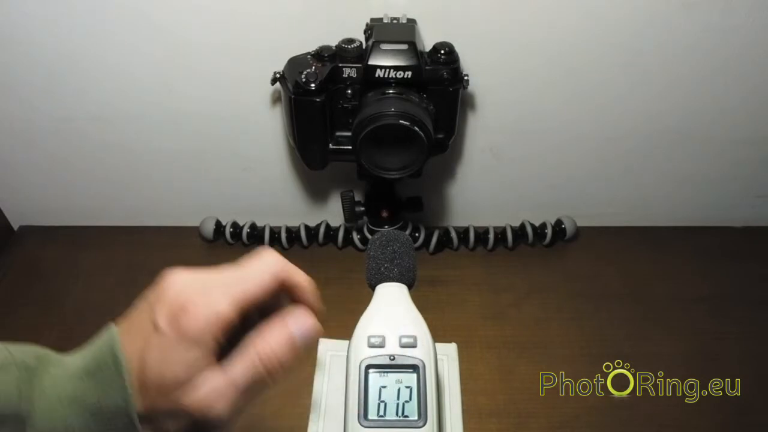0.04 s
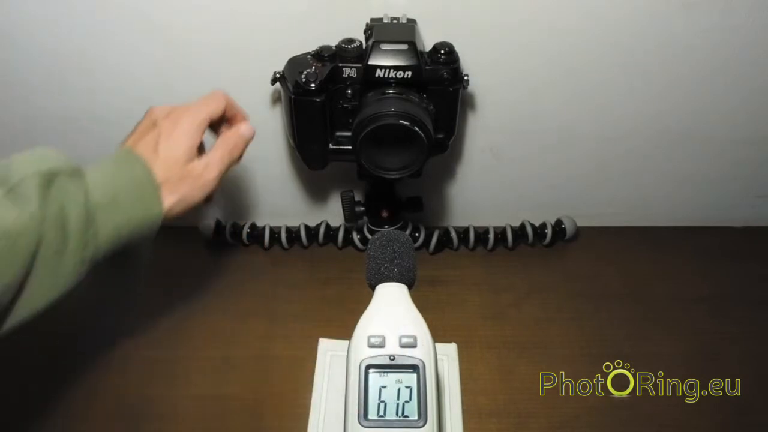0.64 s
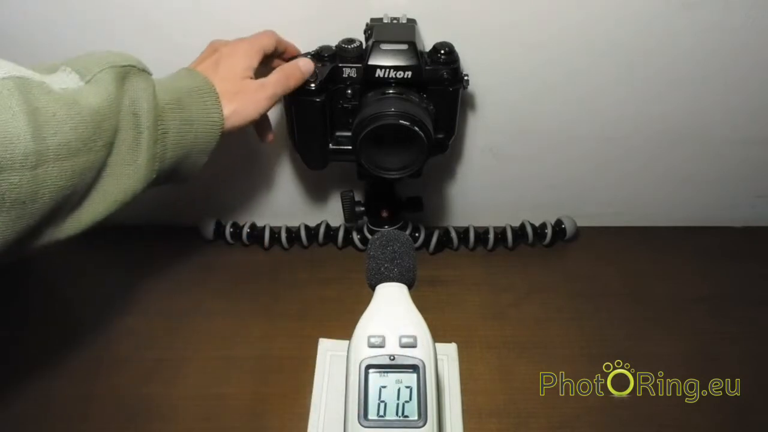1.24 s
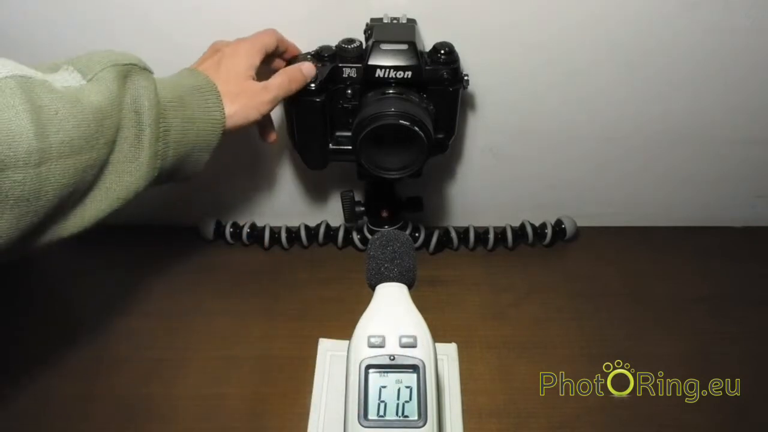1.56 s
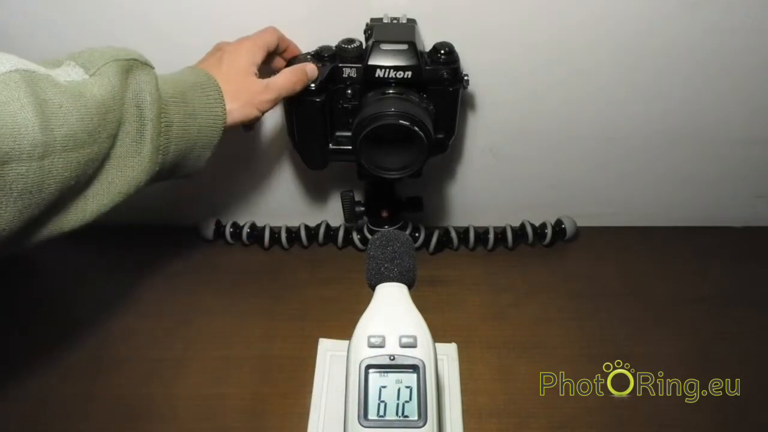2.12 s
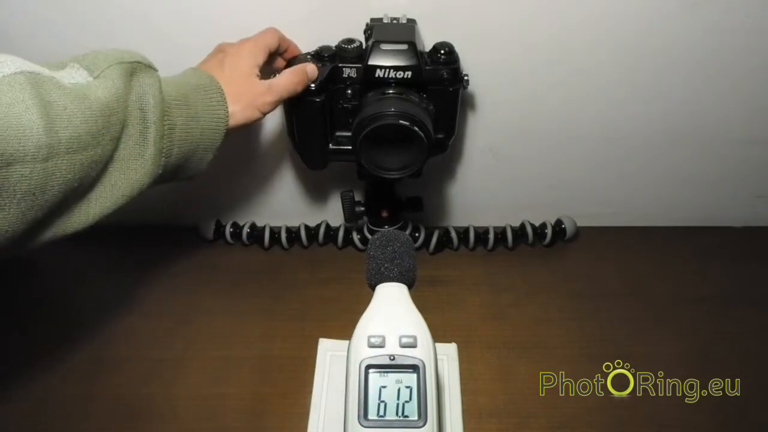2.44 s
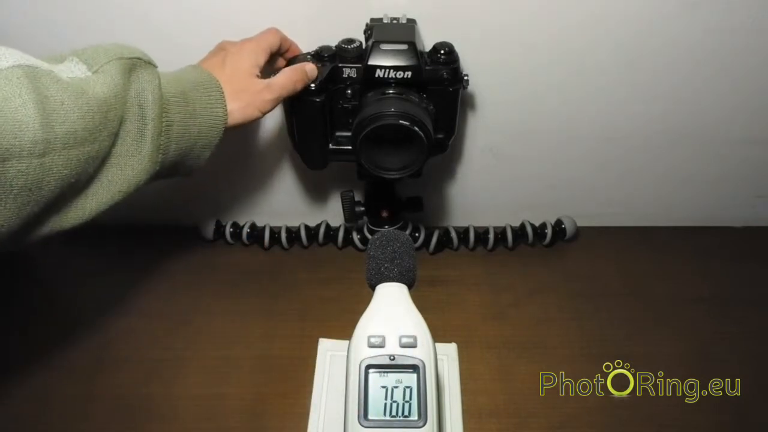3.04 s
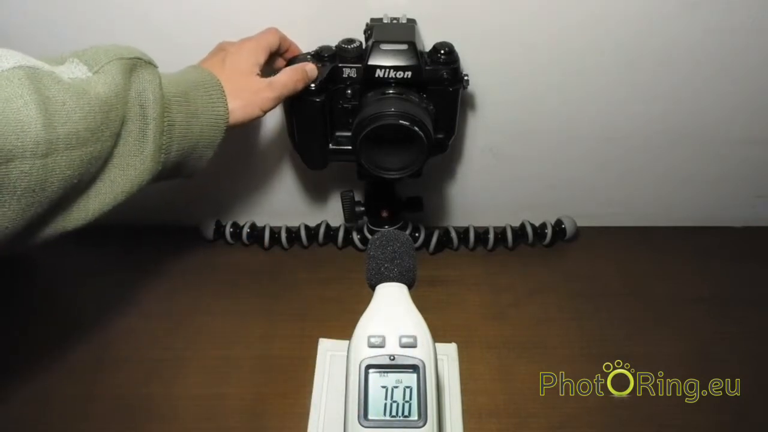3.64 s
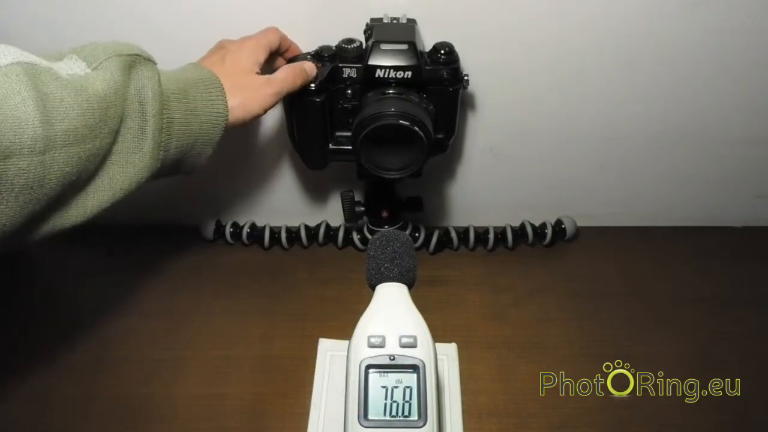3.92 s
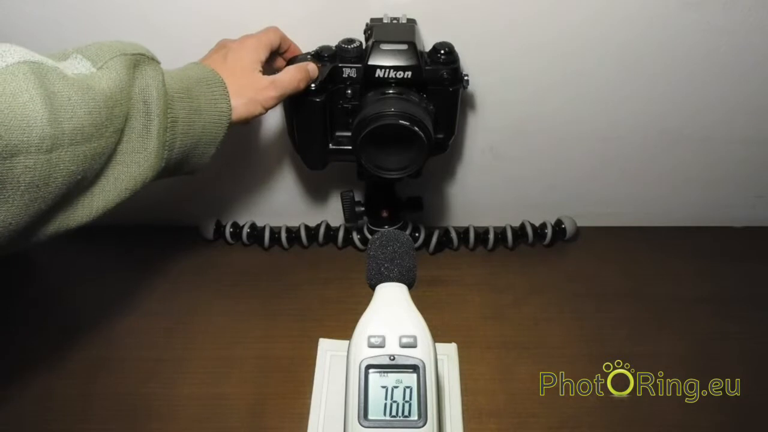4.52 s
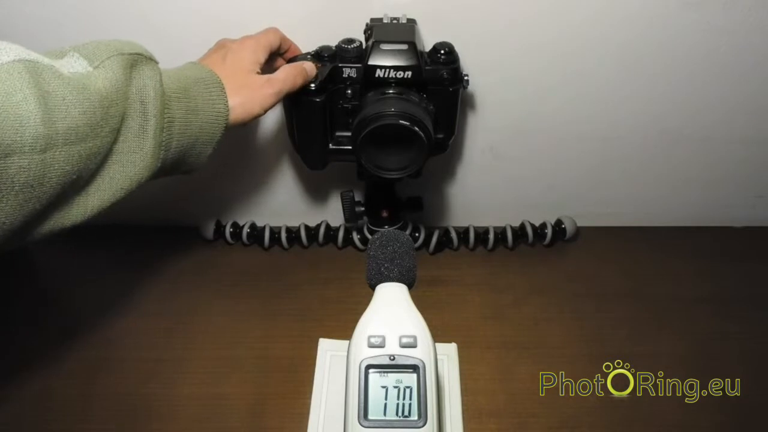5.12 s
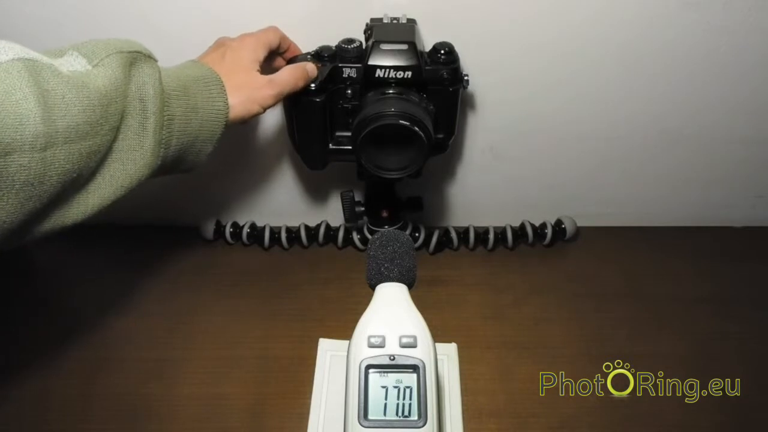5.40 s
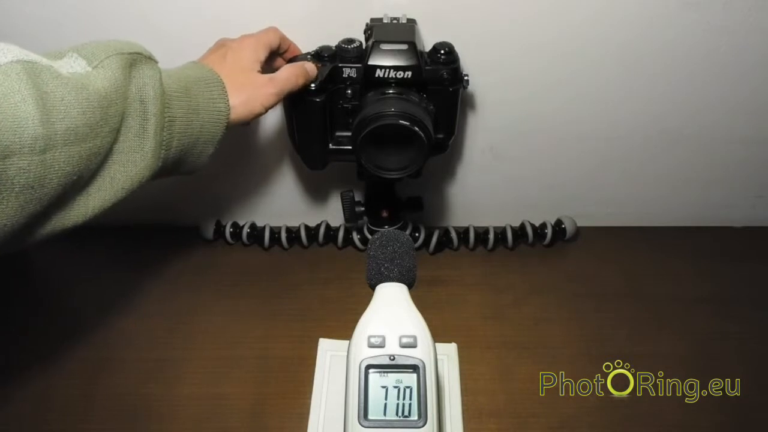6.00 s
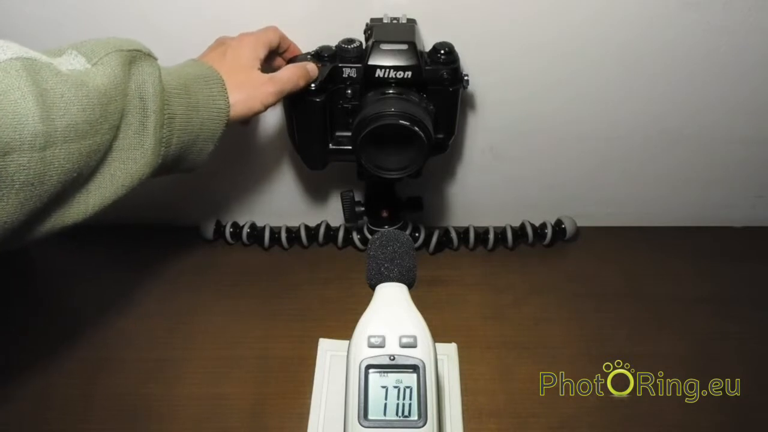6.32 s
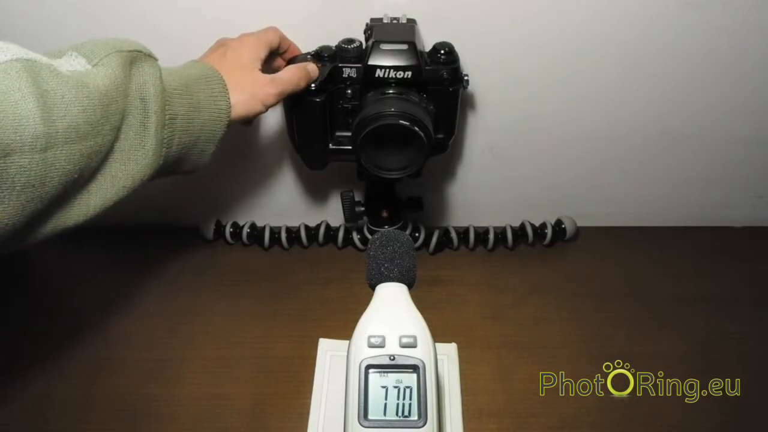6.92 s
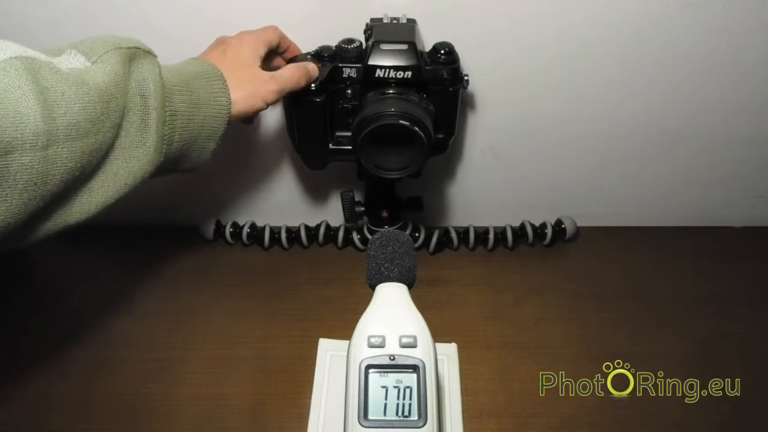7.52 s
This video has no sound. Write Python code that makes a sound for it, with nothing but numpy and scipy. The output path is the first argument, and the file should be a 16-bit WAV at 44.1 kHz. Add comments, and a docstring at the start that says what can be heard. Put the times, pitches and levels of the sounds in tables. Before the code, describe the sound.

For the first two seconds there is only soft room hiss and a faint, distant low rumble. At about 2.4 seconds a motorised film camera on a small tripod fires, close to the microphone. It fires again at about 3.3, 4.5, 5.6, 6.6 and 7.6 seconds, six single shots in all, the last right at the end. Each shot lasts about a quarter of a second and sounds nearly the same: a sharp, bright clack as the mirror flips up, a shutter click, then a quick rattling, rising whirr of gears with tiny ticks as the film winds, ending in a hard click. A slight low shudder of the camera body lies underneath. After each shot comes a short room echo, and springs ring on very faintly with a thin metallic tone. The hiss continues steadily between the shots.

```python
"""Quiet room: a motorised film camera on a small tripod fires six single frames.
Per frame the mirror flips up, the shutter closes, the mirror drops; each blow rings the part struck.
A small motor cocks the mechanism past a latch and winds the film to a stop: gears rattle and whine,
a pawl ticks, the body rocks on its tripod. Springs ring on faintly.
Behind it: a short room tail, hiss and a distant rumble."""
import sys
import numpy as np
from scipy import signal
from scipy.fft import rfft, irfft, next_fast_len
from scipy.io import wavfile

SR = 44100
rng = np.random.default_rng(int(sys.argv[2]) if len(sys.argv) > 2 else 0)


def bounce(signal):
    """Save signal as a 16-bit WAV file at the path given by the first command-line argument."""
    frames = np.transpose(np.atleast_2d(signal))
    limited = np.clip(frames, -1, 1)
    pcm = np.round(limited * 32767).astype(np.int16)
    wavfile.write(sys.argv[1], SR, pcm)


N = 341775
CYCLE_S = np.arange(int(.3 * SR)) / SR   # time after release
GRID_HZ = np.maximum(np.fft.rfftfreq(8192, 1 / SR), 1)

# frames: release t/s, winding lag/s, blow gain/dB, return spring level/dB
FRAMES = [(2.3642, -0.001, 0.0, -72.5), (3.3254, -0.00068, 0.3, -66), (4.5284, -0.0029, 0.1, -63.5),
          (5.5654, -0.00056, 0.5, -67), (6.6069, 0.0024, 0.0, -73), (7.6075, -0.00023, 0, -70)]
WINDING_PARTS = ("mirror down", "latch", "gears", "pawl", "stop")
# blows of one cycle: part, t/s after release, level/dB, lead of first touch/s
BLOWS = [("mirror up", .0021, -17, 0.0016), ("mirror up", .0038, -14.5, .002),
         ("mirror up", .0232, -23, 0.0075), ("shutter", .0591, -21.5, .0035),
         ("mirror down", .0828, -29, .002), ("mirror down", .0875, -26, .002),
         ("mirror down", .112, -30, .004), ("latch", .129, -17, .003), ("gears", .1845, -29.5, 0.0035),
         ("stop", .192, -25, .003), ("stop", .1968, -17, .002), ("stop", .2158, -27, .006)]
# moving parts, by name: blow t60/s, left minus right/dB
PARTS = {"mirror up": (0.026, -1.5), "shutter": (0.034, 0), "mirror down": (0.063, -.5),
         "latch": (0.026, -1.5), "gears": (0.05, -.5), "pawl": (.042, -2), "stop": (0.035, -1)}
# broad response, by part: f/Hz, level/dB
PART_COLOUR = {"mirror up": [(200, -25), (450, -21), (700, -23.5), (1100, -8.5), (1800, -2.5), (3500, -9.5),
               (6000, 0), (9000, -3), (11500, -11), (15500, -18.5)], "shutter": [(200, -10.5), (450, -13.5),
               (700, -0.5), (1100, -1.5), (1800, -2.5), (3500, 0), (6000, 1), (9000, 1.5), (11500, -11.5),
               (15500, -23)], "mirror down": [(200, -25), (450, -26), (700, -5), (1100, -5.5), (1800, -8.5),
               (3500, 0.5), (6000, -4), (9000, -5.5), (11500, -18), (15500, -28)], "latch": [(200, -29),
               (450, -34), (700, -14.5), (1100, 3), (1800, -29.5), (3500, -2), (6000, -4.5), (9000, -3),
               (11500, -14), (15500, -26)], "gears": [(200, -31.5), (450, -18.5), (700, -15.5), (1100, -11),
               (1800, 0), (3500, -3.5), (6000, -11.5), (9000, -15.5), (11500, -19), (15500, -25.5)],
               "pawl": [(200, -30), (1500, -12), (5000, 0), (9500, 9), (11500, -7), (15500, -10)],
               "stop": [(200, -25), (450, -20.5), (700, -10.5), (1100, -5), (1800, -4), (3500, 0),
               (6000, -1), (9000, -1), (11500, -17), (15500, -32)]}
# resonances, by part: f/Hz, width/Hz, lift/dB
PART_MODES = {"mirror up": [(767, 140, 10.5), (1202, 71, 13.5), (1735, 100, 7), (1960, 460, 8),
              (2722, 510, 11), (3710, 940, 14), (4224, 260, 4), (4754, 350, 6), (9160, 1300, 7)],
              "shutter": [(753, 100, 9), (1098, 180, 7), (1481, 110, 7), (2061, 120, 6), (3687, 300, 8),
              (4773, 350, 11), (8062, 1100, 5)], "mirror down": [(812, 100, 0.5), (1160, 140, 10.5),
              (1565, 190, 14), (2160, 540, 9), (3370, 66, 9), (4750, 940, 3)], "latch": [(1542, 88, 17),
              (1745, 250, 27.5), (1920, 380, 5.5), (2520, 440, 19.5), (2900, 390, 6), (3790, 490, 9.5),
              (4350, 220, 6)], "gears": [(930, 140, 5.5), (1100, 130, 4), (3970, 830, 2.5),
              (8726, 720, 5.5)], "pawl": [(8600, 700, 5)], "stop": [(575, 73, 10.5), (856, 46, 12),
              (1170, 130, 11.5), (1552, 316, 16.5), (1764, 130, 7.5), (2590, 150, 9), (3500, 490, 6)]}

LATCH_S, STOP_S = .122, .197   # after release
START_HZ, FREE_HZ = 608.7, 2313   # gear mesh rate
# gear whine: multiple of mesh rate, level/dB
WHINE_HARMONICS = [(1, -2.5), (2, -5), (4, -15.5)]
# resonances of the body on its tripod: f/Hz, level/dB
TRIPOD_MODES = [(185, -3), (395, -6.5)]
# rocking from falling mirror and stop: peak t/s after release, level/dB
TRIPOD_SHAKES = [(.097, -49), (.215, -61.5)]
# spring resonances: f/Hz, level/dB, t60/s
SPRING_MODES = [(1055, -72, 4), (1511, -65, 0.35), (1526, -51, 0.93), (1780, -66, 2.4)]
# return spring resonances: f/Hz, level/dB re the frame's spring level, t60/s
RETURN_SPRING_MODES = [(434, -9.5, 4.5), (880, 2, 4.5)]
# stereo width of the direct sound: f/Hz, side gain/dB
DIRECT_WIDTH = [(200, -36), (700, -14.5), (1300, -13), (2400, -2.5), (5000, -5), (9000, -3.5),
                (15000, -1.5)]

# room tail: f/Hz, level/dB, t60/s, left-right correlation
ROOM_TAIL = [(150, -16, .45, .9), (400, -9.5, .45, 0.9), (900, -10, 0.45, 0.66), (2000, -11, .47, .2),
             (4000, -14, 0.45, .1), (8580, -8.5, .39, .05), (14960, -10, .25, .05)]
# room and microphone hiss: f/Hz, relative density/dB
HISS_SPECTRUM = [(40, -19), (80, -1.5), (115, 0), (190, -2), (420, -3), (1000, -2), (1300, -8.5),
                 (1700, -5), (4200, -9), (5500, -16), (6700, -20.5), (8500, -16.5), (13500, -17.5),
                 (16000, -22)]
# stereo width of the hiss: f/Hz, side gain/dB
HISS_WIDTH = [(60, -16), (120, -5), (400, -3), (1300, -1), (3000, -2), (15000, 2)]
# distant rumble: f/Hz, relative density/dB
RUMBLE_SPECTRUM = [(15, -44), (30, -18.5), (40, -3), (50, -5.5), (65, -18.5), (130, -62), (400, -100)]
# rumble swells: t/s, peak level/dB, half length/s
RUMBLE_SWELLS = [(.95, -68.5, 0.15), (2.15, -65, 0.42), (3.12, -65, .09)]


def blows(part, variation=.35, spread_db=.04):
    """Mid/side force on a part. It hits the same spots each cycle, so frames differ little."""
    force = np.zeros((2, N))
    t60_s, _ = PARTS[part]
    for delay_s, level_db in contacts(part):
        usual = clatter(t60_s)
        for release_s, lag_s, frame_db, _ in FRAMES:
            blow = np.sqrt(1 - variation ** 2) * usual + variation * clatter(t60_s)
            gain = from_db(level_db + frame_db + spread_db * rng.standard_normal())
            add(force, release_s + delay_s + lag_s * (part in WINDING_PARTS), gain * blow)
    return force


def contacts(part, touch_db=-12.5, bounces=2, bounce_s=.0045, loss_db=9):
    """Strikes per cycle (t/s, level/dB): light touch, blow, weakening rebounds. The pawl only ticks."""
    if part == "pawl":
        return pawl_ticks()
    strikes = []
    for name, at_s, level_db, lead_s in BLOWS:
        if name == part:
            strikes.append((at_s - lead_s, level_db + touch_db))
            strikes += [(at_s + k * bounce_s, level_db - k * loss_db) for k in range(bounces + 1)]
    return strikes


def pawl_ticks(start_s=.078, step_s=.0357, level_db=-32.5):
    """Four even ticks as the film winds (t/s, level/dB)."""
    return [(start_s + k * step_s, level_db) for k in range(4)]


def clatter(t60_s, crack=.78, crack_s=.00064):
    """One blow, mid/side: a sharp crack, then dense modes of equal strength dying together."""
    decay = from_db(-60 * CYCLE_S / t60_s) * (1 + crack * np.exp(-CYCLE_S / crack_s))
    burst = rng.standard_normal((2, len(CYCLE_S))) * decay
    whitened = irfft(np.exp(1j * np.angle(rfft(burst))), len(CYCLE_S))
    return whitened * (CYCLE_S < t60_s) * np.linalg.norm(decay) / np.sqrt(1 + crack / 2)


def resonate(part, force):
    """A part colours the force and rings at its modes; unit mean power gain."""
    level_db = at_hz(PART_COLOUR[part], GRID_HZ)
    for hz, width_hz, lift_db in PART_MODES[part]:
        level_db = level_db + lift_db / (1 + (2 * (GRID_HZ - hz) / width_hz) ** 2)
    return causal_filter(force, rms_one(from_db(level_db)))


def motor(grain_db=3, jitter=.02, flutter=.7, tooth_depth=.55, whine_width=.5):
    """Mid/side tooth rattle and tones (mesh whine, tripod shake). Rattle and whine grow with speed."""
    mesh_hz, load = mesh_rate_hz(), gear_load()
    speed_oct = np.log2(mesh_hz / FREE_HZ)
    rattle_gain = load * from_db(-34 + 5 * speed_oct)
    whine_gain = load * from_db(-35.5 + 12.5 * speed_oct)
    rattle, tones = np.zeros((2, N)), np.zeros((2, N))
    for release_s, lag_s, _, _ in FRAMES:
        start_s = release_s + lag_s
        phase = 2 * np.pi * np.cumsum(mesh_hz * (1 + jitter * wobble(.003))) / SR
        teeth = (1 + tooth_depth * np.cos(phase)) * rattle_gain * from_db(grain_db * wobble(.0012))
        add(rattle, start_s, teeth * rng.standard_normal((2, len(CYCLE_S))))
        for multiple, level_db in WHINE_HARMONICS:
            whine = np.sin(multiple * phase + rng.uniform(0, 2 * np.pi, (2, 1))) * [[1], [whine_width]]
            add(tones, start_s, whine_gain * from_db(level_db) * (1 + flutter * wobble(.002)) * whine)
        add(tones[0], start_s, tripod_shake())
    return rattle, tones


def mesh_rate_hz(doubling_s=.098, spin_up_s=.019, coast_s=.072):
    """The motor labours up to speed, spins free past the latch, coasts after the stop."""
    loaded_hz = START_HZ * 2 ** (np.minimum(CYCLE_S, LATCH_S) / doubling_s)
    driven_hz = FREE_HZ + (loaded_hz - FREE_HZ) * np.exp(-since(LATCH_S) / spin_up_s)
    return driven_hz * np.exp(-since(STOP_S) / coast_s)


def gear_load(engage_s=.015, jolt_db=15, jolt_s=.025, unload_db_per_s=199):
    """Tooth force gain: a jolt on engaging, steady while driven, fading once the motor is cut."""
    load_db = jolt_db * np.exp(-CYCLE_S / jolt_s) - unload_db_per_s * since(STOP_S)
    return np.minimum(CYCLE_S / engage_s, 1) ** 2 * from_db(load_db)


def tripod_shake(rise_db_per_s=169, fall_db_per_s=222, roughness_rad=.5):
    """Falling mirror and stop rock the body; each shake builds and dies away."""
    envelope, shake = 0, 0
    for peak_s, level_db in TRIPOD_SHAKES:
        drop_db = np.maximum(rise_db_per_s * (peak_s - CYCLE_S), fall_db_per_s * (CYCLE_S - peak_s))
        envelope += from_db(level_db - drop_db)
    for hz, level_db in TRIPOD_MODES:
        gain = from_db(level_db) * (1 + wobble(.0074) / 2)
        shake += gain * np.sin(2 * np.pi * hz * CYCLE_S + roughness_rad * wobble(.012))
    return envelope * shake


def springs(width=.5):
    """Springs ring from the stop until the next cycle moves them; mid/side."""
    ringing = np.zeros((2, N))
    next_releases_s = [frame[0] for frame in FRAMES[1:]] + [N / SR]
    for (release_s, lag_s, _, spring_db), next_s in zip(FRAMES, next_releases_s):
        t = np.arange(int((next_s - release_s - STOP_S / 2) * SR)) / SR
        return_modes = [(hz, db + spring_db, t60_s) for hz, db, t60_s in RETURN_SPRING_MODES]
        for hz, level_db, t60_s in SPRING_MODES + return_modes:
            ring = from_db(level_db - 60 * t / t60_s) * np.sin(2 * np.pi * hz * t)
            add(ringing, release_s + lag_s + STOP_S, ring * [[1], [width * rng.uniform(-1, 1)]])
    return ringing


def room(source, first_echo_s=.0039, build_s=.0049):
    """Dense reflections: quick build-up, treble dies first."""
    t = np.arange(int(.7 * SR)) / SR
    hz = np.fft.rfftfreq(len(t), 1 / SR)
    edges_hz = np.geomspace(90, 17000, 16)
    onset = 1 - np.exp(-np.maximum(t - first_echo_s, 0) / build_s)
    white = rfft(rng.standard_normal((2, len(t))))
    response = 0
    for low_hz, high_hz in zip(edges_hz, edges_hz[1:]):
        centre_hz = np.sqrt(low_hz * high_hz)
        level_db, t60_s, correlation = (at_hz(ROOM_TAIL, centre_hz, column) for column in (1, 2, 3))
        mid, side = irfft(white * ((hz >= low_hz) & (hz < high_hz)), len(t))
        pair = np.sqrt((1 + correlation) / 2) * mid + np.sqrt((1 - correlation) / 2) * side * [[1], [-1]]
        decay = onset * from_db(-60 * t / t60_s)
        response += from_db(level_db) * pair * decay / np.linalg.norm(decay)
    return signal.oaconvolve(source[None], response, axes=1)[:, :N]


def hiss(mid_db=-63, left_lag_samples=4):
    """Room and microphone hiss, slightly late on the left."""
    mid, side = coloured_noise(HISS_SPECTRUM), coloured_noise(HISS_SPECTRUM)
    left, right = from_db(mid_db) * stereo(mid, side, HISS_WIDTH)
    return np.array([np.roll(left, left_lag_samples), right])


def rumble(floor_db=-73):
    """Distant mono rumble with three swells."""
    t = np.arange(N) / SR
    swell_power = sum(from_db(peak_db) ** 2 * np.exp(-((t - peak_s) / half_s) ** 2)
                      for peak_s, peak_db, half_s in RUMBLE_SWELLS)
    return np.sqrt(from_db(floor_db) ** 2 + swell_power) * coloured_noise(RUMBLE_SPECTRUM)


def coloured_noise(spectrum):
    """Steady noise of a given spectrum, rms 1."""
    size = next_fast_len(N)
    hz = np.maximum(np.fft.rfftfreq(size, 1 / SR), 1)
    shaped = rfft(rng.standard_normal(size)) * from_db(at_hz(spectrum, hz))
    return rms_one(irfft(shaped, size)[:N])


def wobble(step_s):
    """Random drift over one cycle, spread about 1."""
    return np.interp(CYCLE_S / step_s, np.arange(len(CYCLE_S)), rng.standard_normal(len(CYCLE_S)))


def causal_filter(x, gain):
    """Minimum-phase filter from a gain curve on GRID_HZ; no pre-ringing."""
    cepstrum = irfft(np.log(gain + 1e-9))
    half = len(cepstrum) // 2
    folded = np.r_[cepstrum[0], 2 * cepstrum[1:half], np.zeros(half)]
    kernel = irfft(np.exp(rfft(folded)))[:half]
    return np.array([signal.oaconvolve(row, kernel)[:N] for row in np.atleast_2d(x)])


def stereo(mid, side, width):
    """Mid/side to left/right, side shaped by a width table."""
    return mid + causal_filter(side, from_db(at_hz(width, GRID_HZ))) * [[1], [-1]]


def panned(pair, pan_db):
    """Tilt a pair; pan_db is left minus right."""
    return pair * from_db(np.array([[pan_db], [-pan_db]]) / 2)


def add(track, at_s, sound):
    """Mix a sound in from at_s."""
    start = min(int(round(at_s * SR)), N)
    piece = sound[..., :N - start]
    track[..., start:start + piece.shape[-1]] += piece


def since(at_s):
    """Cycle time past at_s, zero before."""
    return np.maximum(CYCLE_S - at_s, 0)


def at_hz(points, hz, column=1):
    """Interpolate a table column over log frequency."""
    table = np.array(points, float)
    return np.interp(np.log(hz), np.log(table[:, 0]), table[:, column])


def from_db(db):
    """dB to gain."""
    return 10 ** (np.asarray(db) / 20)


def rms_one(x):
    """Scale to rms 1."""
    return x / np.sqrt(np.mean(x ** 2) + 1e-20)


def scene():
    """Camera close to the microphones, room around it."""
    rattle, tones = motor()
    direct = stereo(*(tones + springs()), DIRECT_WIDTH)
    room_send = tones[0]
    for part, (_, pan_db) in PARTS.items():
        mid, side = resonate(part, blows(part) + rattle * (part == "gears"))
        direct = direct + panned(stereo(mid, side, DIRECT_WIDTH), pan_db)
        room_send = room_send + mid
    return direct + panned(room(room_send), pan_db=-1) + hiss() + rumble()


def record(dry):
    """Steep low-pass, small converter offset."""
    cutoff_hz, dc_offset = 16000, -.0012
    low_pass = signal.ellip(12, .1, 80, cutoff_hz, fs=SR, output="sos")
    return signal.sosfilt(low_pass, dry) + dc_offset


dry = scene()
out = record(dry)
bounce(out)
```